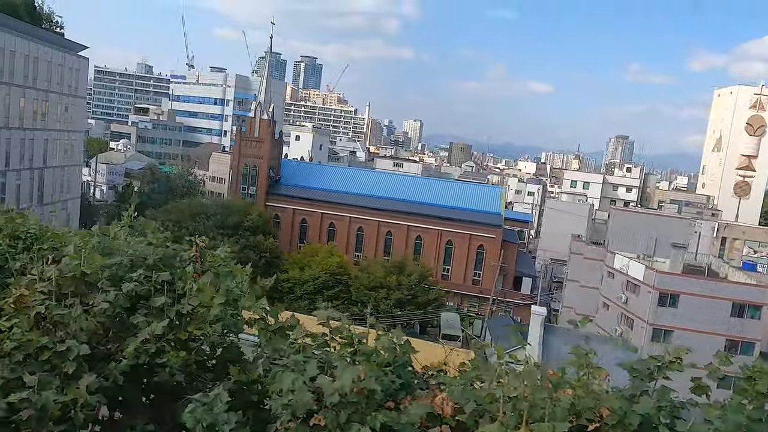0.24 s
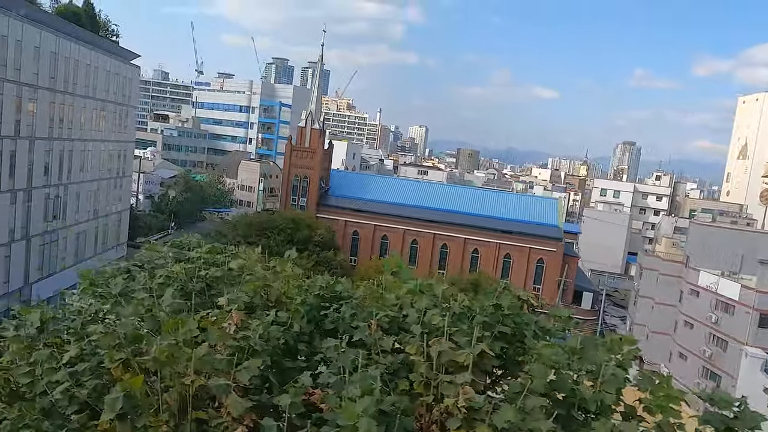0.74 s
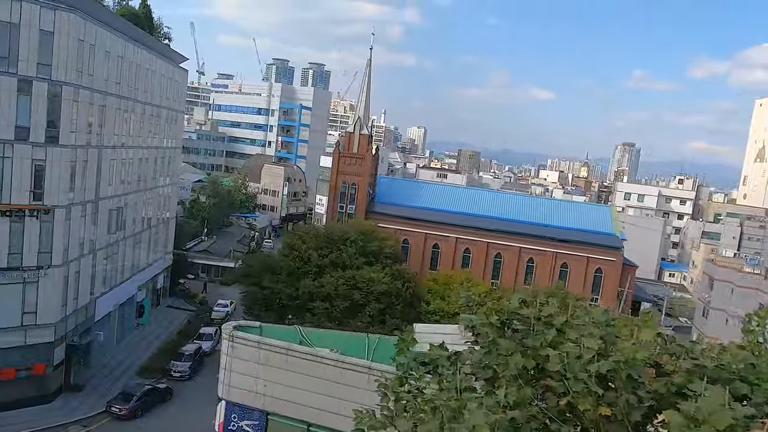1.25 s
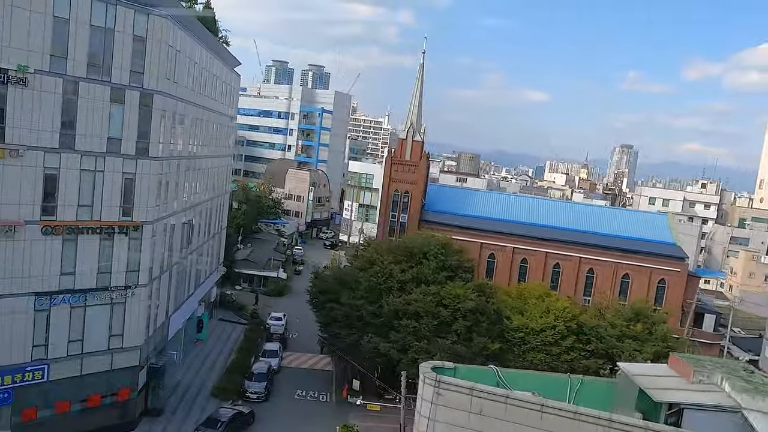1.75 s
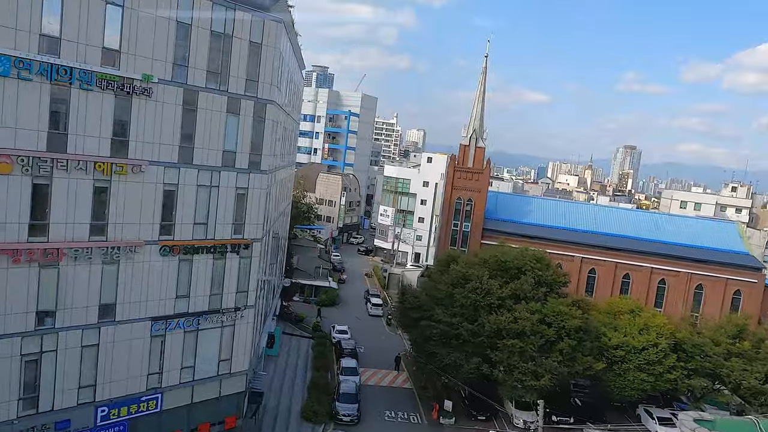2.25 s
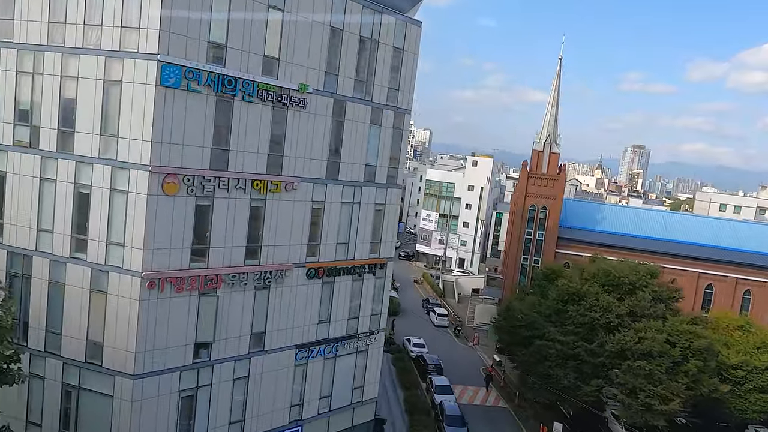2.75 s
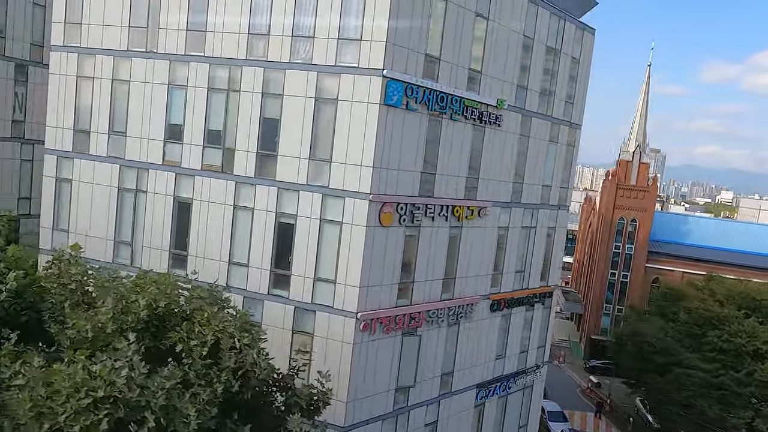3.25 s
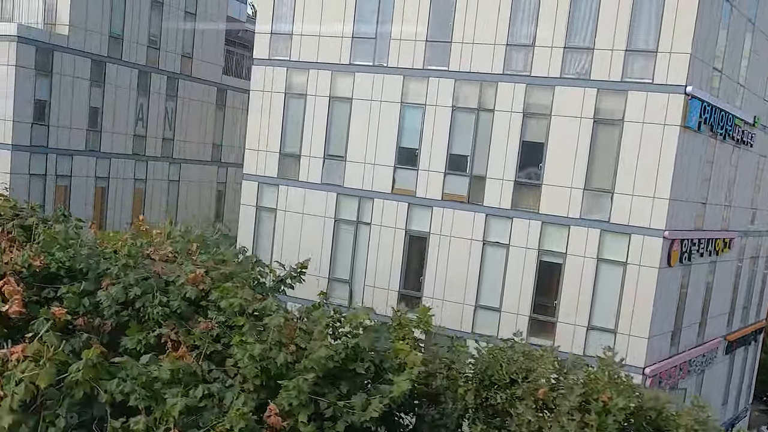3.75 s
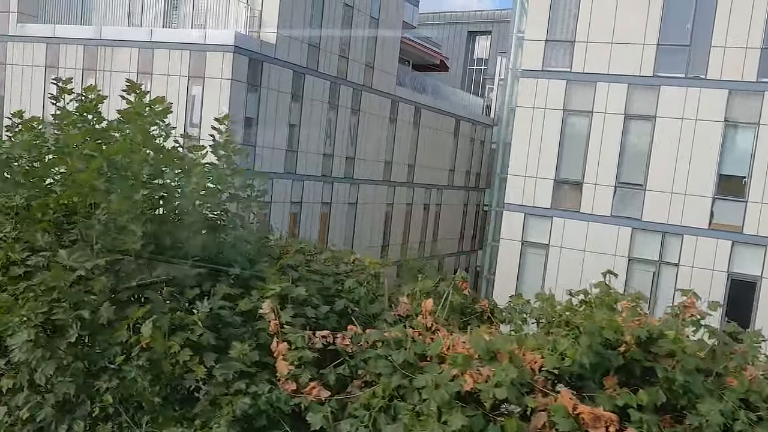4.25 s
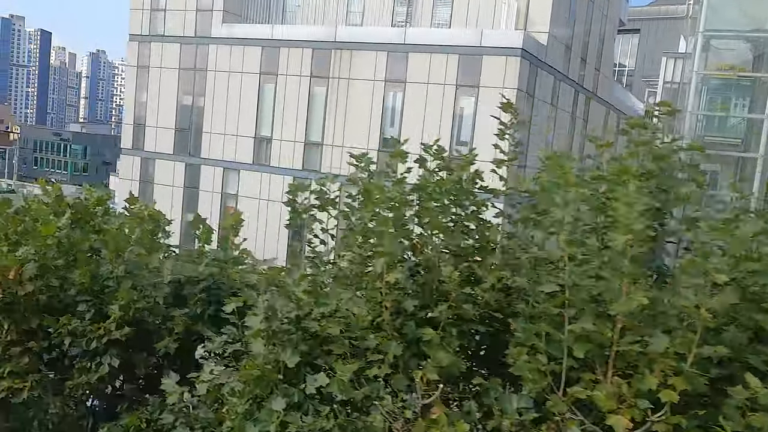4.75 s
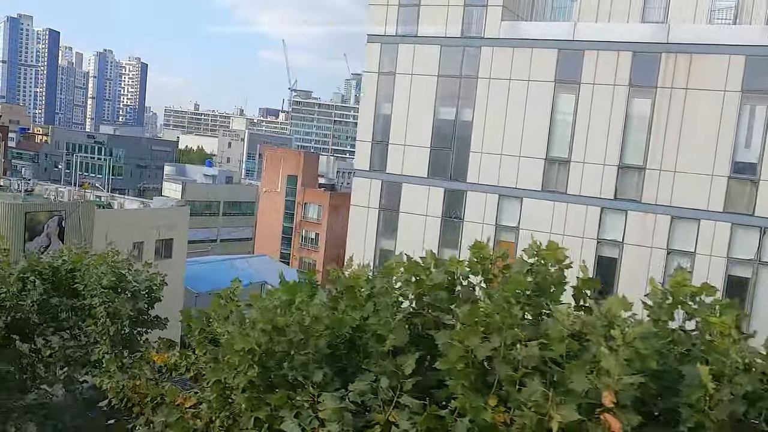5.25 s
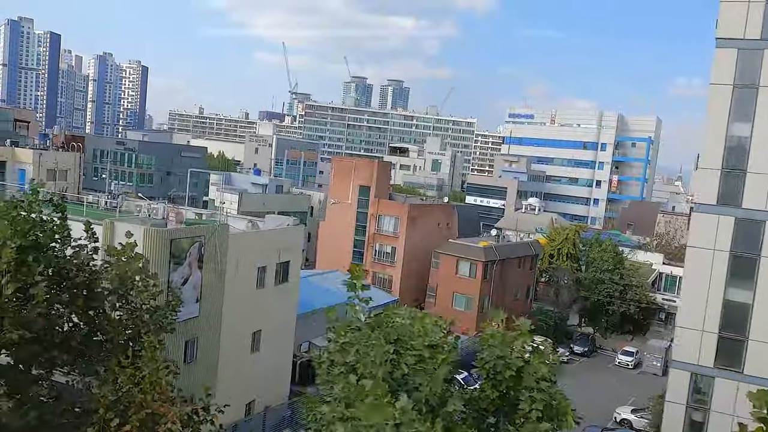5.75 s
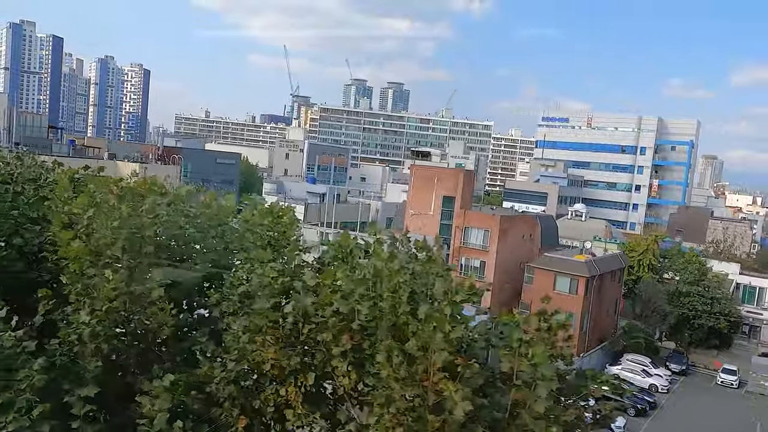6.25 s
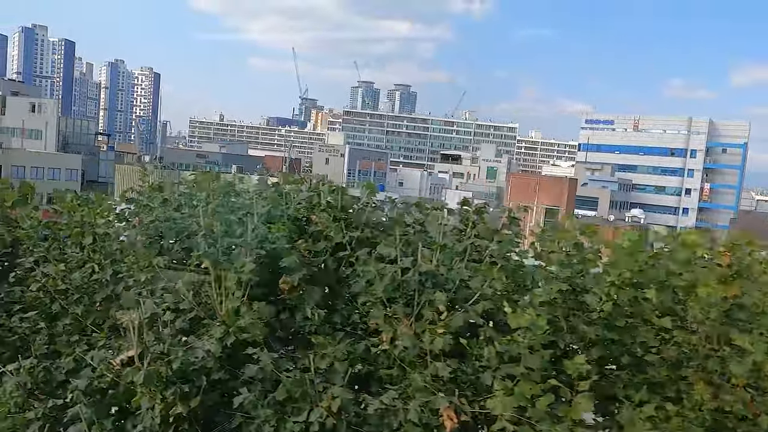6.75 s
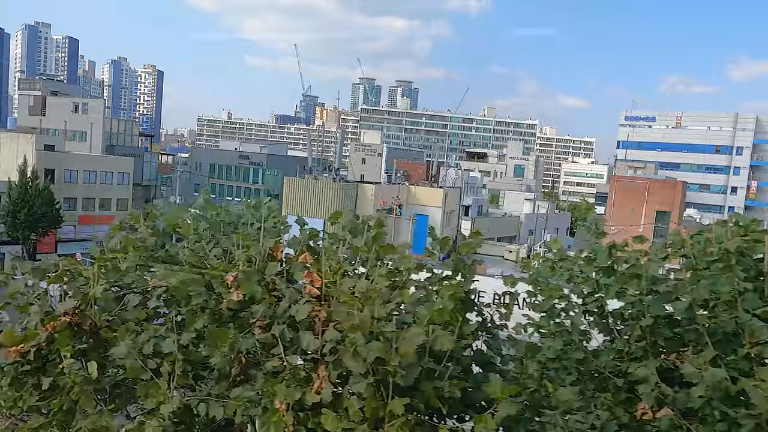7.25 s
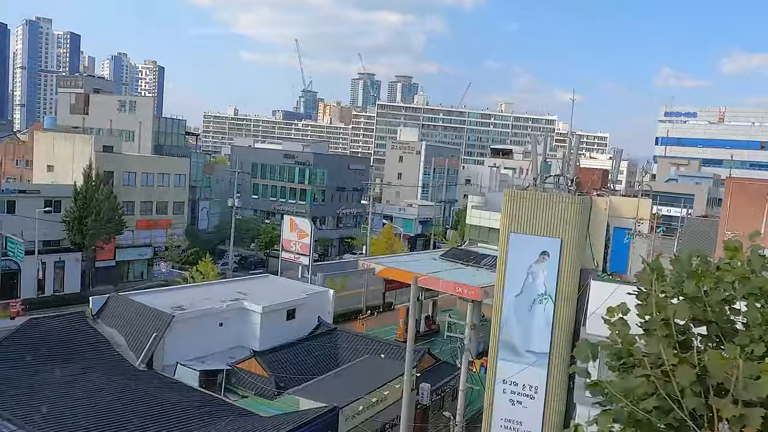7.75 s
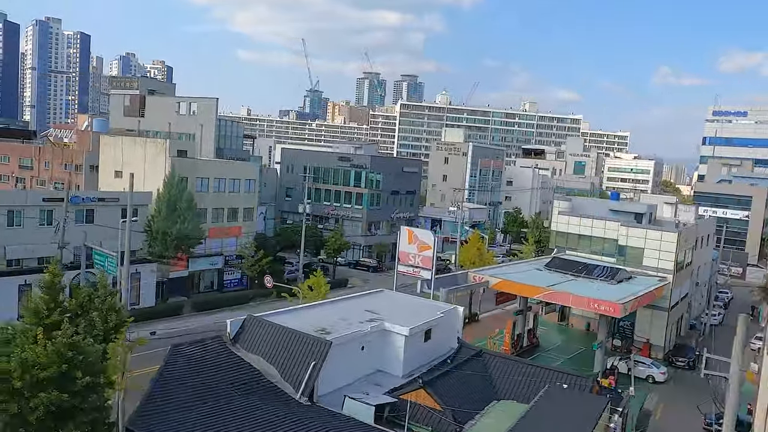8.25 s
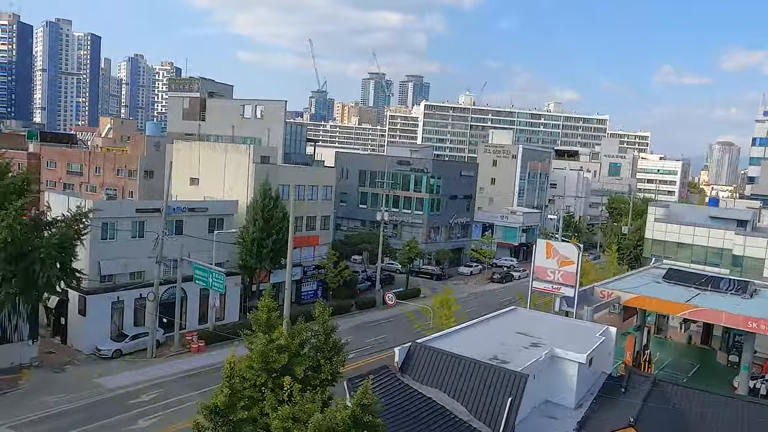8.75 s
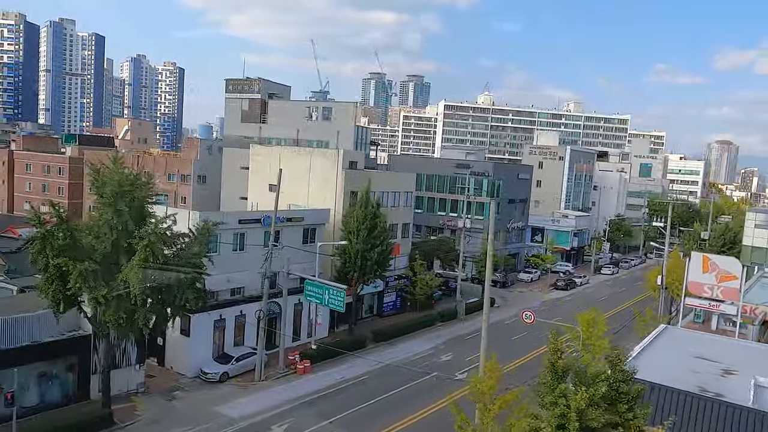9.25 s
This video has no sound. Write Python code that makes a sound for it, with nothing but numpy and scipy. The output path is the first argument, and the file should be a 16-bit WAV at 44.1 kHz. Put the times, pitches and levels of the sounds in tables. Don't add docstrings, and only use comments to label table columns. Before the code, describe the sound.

Inside an elevated rubber-tyred train car, heard at arm's length from a window seat. A deep, uneven boom and steady low drone dominate throughout, with muffled tyre roar, a faint roof-unit hum near a low-mid pitch, and soft airy hiss above. From 0 to 3 s the ride is mostly smooth; low body resonances swell from about 1.2 s, with a faint soft rub. At 3.2-3.6 s a sway brings sharp small plastic ticks, hollow panel knocks and dull floor thuds. A strong hollow knock lands near 4.05 s, and irregular clicks and rattles continue, clustering at 4.9-5.4 s with the hardest thud at 5.3 s. Knocks become sparser from 5.9 to 7.5 s, with a longer dull rub around 6.6 s. From 7.8 s the fan hiss gently rises; knocks and two weaker thuds cluster at 8.3-8.7 s, then the rumble continues to 9.5 s.

```python
import sys
import numpy as np
from scipy import signal
from scipy.fft import rfft, irfft
from scipy.io import wavfile
from scipy.ndimage import uniform_filter1d

SR = 44100
rng = np.random.default_rng(int(sys.argv[2]) if len(sys.argv) > 2 else 0)


def wav_out(sig):
    wavfile.write(sys.argv[1], SR, np.round(np.clip(np.atleast_2d(sig).T, -1, 1) * 32767).astype(np.int16))


def boost(x):
    u = np.asarray(x, float) / 20
    return 10 ** u


N = 419391
HZ = np.fft.rfftfreq(N, 1 / SR)
TIME = np.arange(N) / SR
MIC_TOP_HZ = 12600

# f/Hz, level/dB
LOW_COLOUR = [(2.4, -36), (4.0, -8.5), (38, 4), (76, -3), (130, -3.5), (172, -6.5), (265, -12.5),
              (295, -14), (351, -15), (399, -23), (454, -24.5), (589, -30.5), (628, -33), (700, -25.5),
              (910, -64.5), (1540, -120)]
HIGH_COLOUR = [(420, -4.5), (631, -10), (850, -14.5), (983, -13), (1550, -14.5), (2640, -30), (4000, -32.5),
               (5200, -33.5), (6400, -31), (7300, -37), (8200, -44), (9600, -47), (12200, -55),
               (15000, -78)]
# f/Hz, width/Hz, level/dB
CABIN_MODES = [(29, 4, -4), (63.8, 5.8, 4), (91.1, 7.6, 6.5), (122.3, 3.5, 4), (370, 4.3, 3),
               (211.2, 6.4, 6.5), (266.7, 15, 4), (372.3, 9.9, 2), (419, 4.5, 4.5), (428, 7.2, 5),
               (511.5, 17, 5.5), (587.7, 8.3, 7.5), (895, 20, 4.5), (887, 23, -6), (980, 44, 1.5),
               (1620, 20, 1.5), (2330, 30, -2.5)]
# t/s, boom level/dB
BOUNCE = [(0, -19), (.4, -29.5), (1.0, -28.5), (1.5, -23), (2.1, -20), (2.35, -25), (2.9, -34),
          (3.05, -18.5), (3.6, -16), (3.85, -23.5), (4.3, -18), (5.45, -18), (5.7, -21.5), (6.2, -25),
          (6.9, -19), (8.0, -25.5), (8.7, -15), (9.1, -27.5)]
# t/s, level/dB
SLACK = [(0, 0.5), (.7, 1.5), (3.5, 1.5), (3.9, 0), (5.6, -0.5), (6.5, 0.5), (8.4, 0.1), (9.51, -1.5)]
# t/s, roar level/dB
TYRE_LOAD = [(0, -41.5), (1.2, -40.5), (3.3, -39.5), (3.8, -40.5), (4.4, -39.5), (5.5, -41), (6.6, -38.5),
             (8.4, -39), (8.9, -39.5), (9.51, -38.5)]
# f/Hz, rms level/dB, wobble/Hz
MACHINE_TONES = [
    (350.4, -43, 3.0),
    (2960, -77, 4.0),
    (5280, -76, 1.5),
]
# t/s, length/s, f/Hz, rms level/dB
SURGES = [(0.452, .4, 56, -43), (1.248, 0.22, 72, -19), (2.298, 0.26, 80, -20.5), (2.68, 0.34, 92, -21),
          (3.998, 0.17, 60, -28), (4.85, 0.26, 50, -19), (5.145, .25, 125, -22.5), (6.546, 0.64, 119, -22),
          (6.603, 0.38, 63, -23), (7.134, 0.2, 89, -19), (8.098, 0.27, 99, -19.5), (8.4, 0.25, 56, -23),
          (9.053, 0.22, 62, -19.5), (2.754, 0.5, 135, -27), (4.148, 0.2, 149.8, -23.5),
          (4.906, 0.23, 140, -24.5), (7.299, 0.21, 150, -26.5), (8.275, 0.18, 195.5, -24),
          (3.554, .2, 155, -26)]
# t/s, peak level/dB, centre f/Hz, t60/s
SCUFFS = [
    (1.165, -56.5, 6500, 0.23),
    (1.27, -47, 3200, 0.27),
    (3.331, -45, 3000, 0.24),
    (4.134, -39.5, 2500, 0.11),
    (4.503, -44, 4200, 0.12),
    (6.63, -38.5, 1420, 0.86),
    (6.67, -49.5, 4750, 1.0),
]
# t/s, peak level/dB, ring f/Hz, brightness/dB, low ring level/dB
TICKS = [(3.16, -29.5, 5050, -10.5, -19.5), (3.476, -34.5, 4900, -9, -18), (3.4798, -38.5, 5100, -13, -18),
         (3.4864, -43, 4600, -10, -15), (4.2357, -42, 4950, -1.5, -10.5), (4.3918, -30, 4400, -15, -18.5),
         (4.619, -39, 4200, -20, -19), (4.6437, -37, 4150, -14, -16), (4.932, -43.5, 4250, -12, -17),
         (4.9533, -40.5, 4700, -12, -14), (4.971, -47.5, 4300, -6, -12), (5.114, -46, 4130, -14, -12),
         (5.2374, -42, 4800, -7, -12.5), (5.3128, -35.5, 5000, -24, -19.5),
         (5.399, -44.5, 4600, -13, -16.5), (6.045, -45, 4360, -2, -11), (6.8033, -42, 4900, -8, -11),
         (6.9765, -42, 4740, 0.5, -10), (7.235, -37, 4700, -1, -13.5), (7.2893, -42, 4970, -13, -16),
         (8.137, -47.5, 5130, -1, -12), (8.5732, -42.5, 4170, -6, -12), (8.695, -49, 4400, -3, -10)]
# f/Hz, width/Hz, level/dB
TRIM_LOW = [(2700, 830, 4.5), (3950, 1300, 7.5)]
TRIM_BRIGHT = [(6620, 390, -1.5), (5520, 1150, -0.49)]
TRIM_TOP = [(8680, 550, 2.5), (9370, 800, -9), (11200, 1000, -3.5), (12600, 800, -12)]
# t/s, peak level/dB, upper ring level/dB, upper ring f/Hz, t60/s
KNOCKS = [(3.287, -23, -14, 927, .15), (3.333, -24, -8.5, 990, .1), (3.429, -25, -14, 800, 0.11),
          (3.585, -28, -15, 803, .14), (4.048, -15, -25, 844, 0.094), (4.269, -24.5, -17.5, 885, 0.21),
          (4.557, -30.5, -2, 1046, .12), (4.918, -24.5, -16, 880, .18), (4.958, -33, -17, 821, 0.17),
          (5.033, -28, -10, 900, .14), (5.104, -26, -20.5, 845, 0.13), (5.298, -22.5, -14, 924, 0.19),
          (5.336, -27.5, -14, 956, .16), (5.892, -25.5, -21, 1010, 0.27), (6.381, -21, -17, 956, .14),
          (6.707, -28, -12, 1016, 0.089), (6.964, -27.5, -23, 920, .15), (7.421, -30, -13, 1060, .15),
          (8.29, -21.5, -18.5, 972, .16), (8.504, -23, -22.5, 980, .13), (8.57, -20, -12.5, 946, .13),
          (8.617, -27, -18, 860, 0.17), (8.717, -21, -26.5, 842, .13)]
# f/Hz, level/dB
PANEL_MODES = [(548, 1.5), (591, 0), (482.3, 0), (642, -12)]
# t/s, peak level/dB, f/Hz, t60/s
THUDS = [
    (3.29, -22.5, 264, 0.12),
    (3.48, -14.5, 247.5, 0.089),
    (5.303, -11.5, 268, 0.079),
    (8.285, -18.5, 253, 0.078),
    (8.50, -21, 266, 0.11),
]


def unit(x):
    return x / np.sqrt(np.mean(x ** 2))


def curve(table):
    s, *columns = np.transpose(table)
    return [np.interp(TIME, s, c) for c in columns]


def walk(rate):
    hold = int(SR / rate)
    levels = np.repeat(rng.standard_normal(N // hold + 1), hold)
    return 1.3 * uniform_filter1d(uniform_filter1d(levels, hold), hold)[:N]


def colour(table):
    hz, db = np.transpose(table)
    lift = sum(top_db / (1 + (2 * (HZ - f) / w) ** 2) for f, w, top_db in CABIN_MODES)
    return boost(np.interp(np.log(HZ + 1), np.log(hz), db) + lift)


def band(gain, lo_hz, hi_hz):
    edge = 1 / np.sqrt((1 + (lo_hz / (HZ + 1e-3)) ** 12) * (1 + (HZ / hi_hz) ** 12))
    return irfft(rfft(rng.standard_normal(N)) * gain * edge, N)


def steady(x, hold_s, share):
    k = int(hold_s * SR)
    power = uniform_filter1d(uniform_filter1d(x ** 2, k), k)
    return unit(x * (power + 1e-12) ** (-np.clip(share, 0, 1) / 2))


def rings(hz, modes):
    return sum(boost(db) / (1 + 1j * (hz - f) / w) ** 2 for f, w, db in modes)


def ring(hz, t60, soft_s, size=8192):
    t = np.arange(size) / SR
    return np.sin(2 * np.pi * hz * t) * boost(-60 * t / t60) * (1 - np.exp(-t / soft_s))


def add(out, s, x):
    i = int(s * SR)
    out[i:i + len(x)] += x[:N - i]


def body():
    gain = colour(LOW_COLOUR)
    boom_db, = curve(BOUNCE)
    slack_db, = curve(SLACK)
    more_db = boom_db - boom_db.mean()
    sway = boost(-34.5) * unit(band(gain, 2, 21))
    bounce_mode = rings(HZ, [(28.2, 2.5, 0)])
    bounce = steady(band(bounce_mode, 18, 45), 0.3, 0.86)
    boom = boost(boom_db - 4.0) * (steady(band(gain, 12, 45), 0.19, 0.6) + bounce)
    low_hum = boost(-19.5 + 0.19 * more_db) * steady(band(gain, 43.6, 80.4), 0.14, 0.55)
    drone = boost(-21 + 0.02 * more_db) * steady(band(gain, 84, 152), 0.13, 0.7)
    floor = steady(band(gain, 136.3, 226.4), 0.37, 0.36)
    walls = boost(-2.0) * steady(band(gain, 228, 435), 0.67, 0.37)
    panels = boost(-23.5 - 0.057 * more_db + slack_db) * unit(floor + walls)
    return sway + boom + low_hum + drone + panels


def rolling():
    gain, out, gust = colour(HIGH_COLOUR), 0, walk(6.3)
    roar_db, = curve(TYRE_LOAD)
    slack_db, = curve(SLACK)
    spool_s, spool_length_s, spool_db = 7.8, 1, 2.5
    spool = np.clip((TIME - spool_s) / spool_length_s, 0, 1)
    hiss_db = 0.4 * roar_db + spool_db * spool
    hiss_db = hiss_db - hiss_db.mean() + roar_db.mean()
    whole = np.sqrt(np.mean(band(gain, 700, 2200) ** 2))
    for lo_hz in 420 * 2 ** np.arange(0, 5.4, 0.5):
        hiss_share = np.clip(np.log2(lo_hz / 1500), 0, 1)
        db = (1 - hiss_share) * roar_db + hiss_share * hiss_db
        db = db + (lo_hz < 590) * 0.9 * slack_db
        flicker_db = 0.17 * gust + 0.99 * walk(9)
        out = out + boost(db + flicker_db) * band(gain, lo_hz, lo_hz * np.sqrt(2))
    return boost(-0.11) * out / whole


def hum():
    out = np.zeros(N)
    for hz, db, wobble_hz in MACHINE_TONES:
        level = boost(db + 3.3 * walk(2.2)) * np.sqrt(2)
        phase = 2 * np.pi * np.cumsum(hz + wobble_hz * walk(3)) / SR
        out += level * np.sin(phase)
    return out


def surges():
    out = np.zeros(N)
    waver_s = np.cumsum(1 + 0.02944 * walk(8)) / SR
    for s, length_s, hz, db in SURGES:
        i, k = int(s * SR), int(length_s * SR)
        swell = boost(db + 5) * np.hanning(k) ** 0.6
        add(out, s, swell * np.sin(2 * np.pi * hz * waver_s[i:i + k]))
    return out


def scuffs():
    out, size = np.zeros(N), 8192
    t, hz = np.arange(size) / SR, np.fft.rfftfreq(size, 1 / SR)
    mic = 1 / (1 + (hz / MIC_TOP_HZ) ** 16)
    for s, db, mid_hz, t60 in SCUFFS:
        shape = rings(hz, [(mid_hz, 0.45 * mid_hz, 0)]) * mic
        rub = unit(irfft(rfft(rng.standard_normal(size)) * shape))
        add(out, s, boost(db - 60 * t / t60) * (1 - np.exp(-t / 0.00092)) * rub)
    return out


def ticks():
    out, size = np.zeros(N), 4096
    t, hz = np.arange(size) / SR, np.fft.rfftfreq(size, 1 / SR)
    decay = boost(-60 * t / 0.027) + boost(-15 - 60 * t / 0.18)
    crack = decay * (1 - np.exp(-t / 0.00045))
    mic = 1 / (1 + (hz / MIC_TOP_HZ) ** 16)
    for s, db, ring_hz, bright_db, low_db in TICKS:
        top_db = -9.5 + 0.6 * bright_db
        shape = rings(hz, [(ring_hz, 340, 2.5)])
        shape += boost(bright_db + 10.0) * rings(hz, TRIM_BRIGHT)
        shape += boost(top_db + 5.0) * rings(hz, TRIM_TOP)
        shape += boost(low_db + 11.0) * rings(hz, TRIM_LOW)
        noise = rng.standard_normal(size)
        add(out, s, boost(db + 5.5) * irfft(rfft(noise * crack) * shape * mic))
    return out


def knocks():
    out = np.zeros(N)
    for s, db, upper_db, upper_hz, t60 in KNOCKS:
        spread = 1 + 0.024 * rng.standard_normal(len(PANEL_MODES))
        panel = sum(boost(d) * ring(f * e, t60, 0.0063) for (f, d), e in zip(PANEL_MODES, spread))
        upper = ring(upper_hz, t60, 0.0024) + 0.66 * ring(0.85 * upper_hz, t60, 0.0022)
        lower = boost(-6.5) * ring(284, t60 * 0.89, 0.01)
        add(out, s - 0.004, boost(db - 2.0) * (panel + boost(upper_db + 6.5) * upper + lower))
    return out


def shudders():
    out, size = np.zeros(N), 16384
    t, hz = np.arange(size) / SR, np.fft.rfftfreq(size, 1 / SR)
    shape = (hz / (hz + 150)) ** 2 / (1 + (hz / 350) ** 1.4) / (1 + (hz / 2500) ** 3)
    t60 = 0.35
    for s, db, *_ in KNOCKS:
        rattle = unit(irfft(rfft(rng.standard_normal(size)) * shape))
        add(out, s, boost(db - 17 - 60 * t / t60) * (1 - np.exp(-t / 0.0058)) * rattle)
    return out


def thuds():
    out = np.zeros(N)
    for s, db, hz, t60 in THUDS:
        pan = ring(hz, t60, 0.017) + 1.1 * ring(0.474 * hz, 0.88 * t60, 0.015)
        add(out, s, boost(db + 14) * pan)
    return out


def scene():
    ride = body() + rolling() + hum() + surges()
    fittings = scuffs() + ticks() + knocks() + shudders() + thuds()
    return (ride + fittings)[None]


def band_limit(x):
    return signal.sosfilt(signal.butter(12, 15150, fs=SR, output="sos"), x)


def record(dry):
    memory_s, grip = 0.21, 0.2
    keep = np.exp(-1 / (memory_s * SR))
    mean = np.mean(dry ** 2)
    power = mean + signal.lfilter([1 - keep], [1, -keep], dry ** 2 - mean)
    levelled = dry * (power / mean) ** (-grip / 2)
    mix = np.tanh(0.87 * levelled) / 0.86
    return band_limit(mix)


dry = scene()
out = record(dry)
wav_out(out)
```